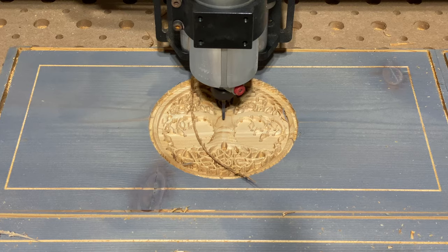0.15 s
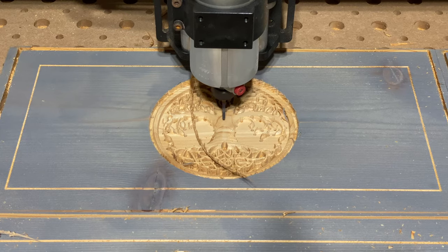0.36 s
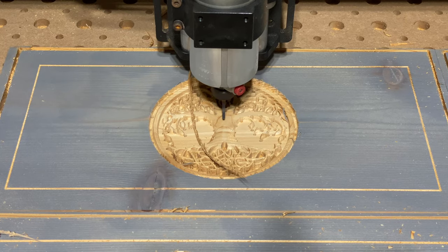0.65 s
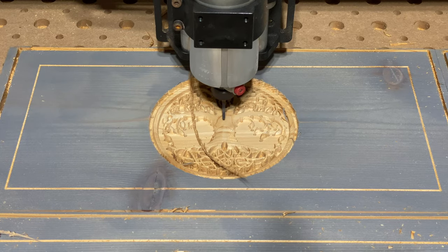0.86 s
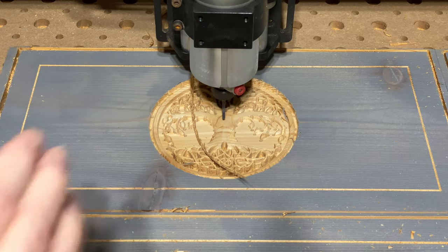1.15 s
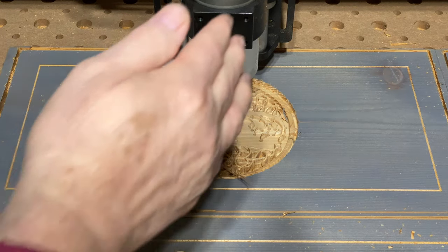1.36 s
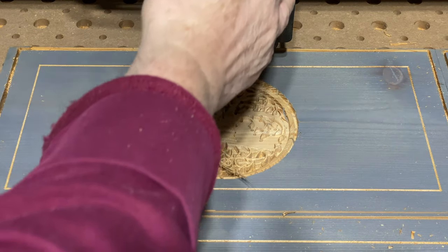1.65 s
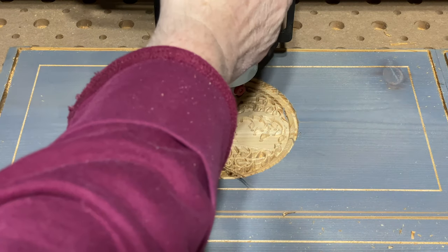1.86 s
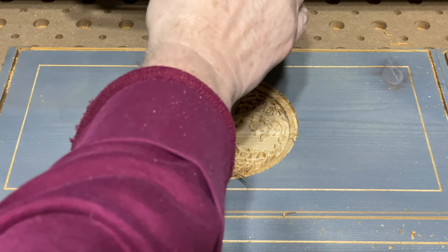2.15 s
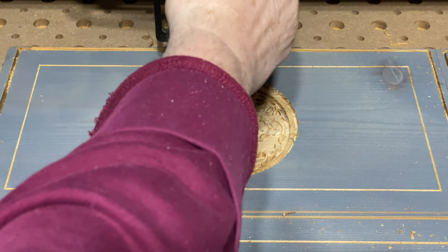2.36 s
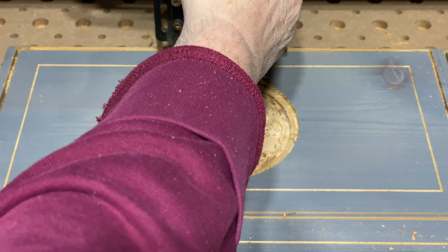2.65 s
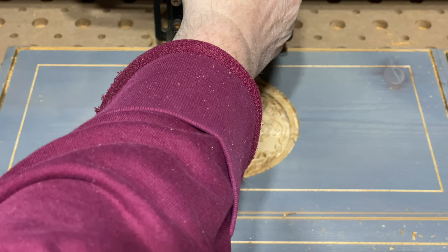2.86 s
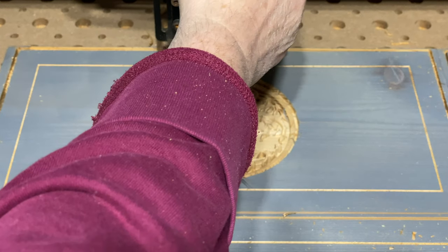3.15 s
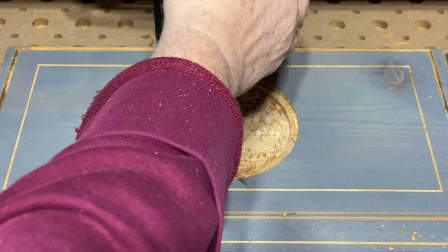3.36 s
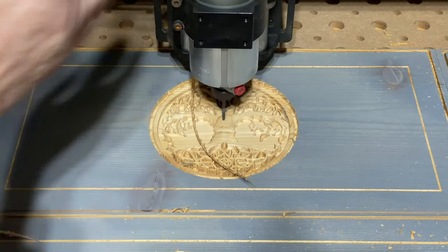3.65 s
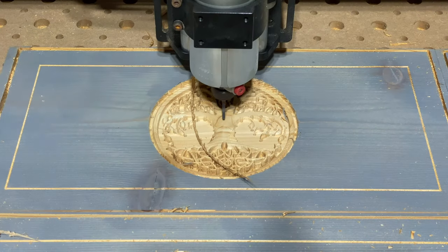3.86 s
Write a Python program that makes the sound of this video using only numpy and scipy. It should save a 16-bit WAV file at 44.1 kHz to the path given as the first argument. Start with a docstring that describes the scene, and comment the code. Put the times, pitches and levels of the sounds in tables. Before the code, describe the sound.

A router spindle whines steadily close by, then is switched off and coasts down in pitch.

```python
"""A router spindle runs close by in a small workshop: the uneven weight of its rotor hums,
the shaft adds harmonics, the bearings whine, and brushes and cooling air make filtered noise.
The whole sound swells up early on. An arm reaches over, shading the treble, and switches it off;
the rotor coasts down, its hum flaring as it passes the resonances of the frame, and brief whines
fall in pitch. Steady coloured noise makes the workshop background."""
import sys
import numpy as np
from scipy import signal
from scipy.fft import rfft, irfft, next_fast_len
from scipy.io import wavfile
from scipy.ndimage import map_coordinates

SR = 44100
rng = np.random.default_rng(int(sys.argv[2]) if len(sys.argv) > 2 else 0)


def wav_out(sig):
    """Save sig, one row per channel (or a flat mono array), as 16-bit PCM at SR to the path in sys.argv[1]."""
    wavfile.write(sys.argv[1], SR, np.round(np.clip(np.atleast_2d(sig).T, -1, 1) * 32767).astype(np.int16))


N = 176400
TIME_S = np.arange(N) / SR

RUN_HZ = 280.3  # shaft turns per second while powered
# Tone colour that the housing gives to air and rasp.
# Each row: frequency in Hz, relative level in dB per Hz.
HOUSING_COLOUR = [(30, -75), (100, -59), (170, -32), (260, -12), (385, -8.5), (680, -9.5), (790, -5),
                  (910, 3.5), (1050, -2), (1250, -2.5), (1420, -5.5), (2000, -7.5), (2450, -11), (2850, -5),
                  (3350, -5.5), (3600, -13), (7000, -16), (7550, -12), (8400, -17), (9400, -22),
                  (10600, -19), (11700, -24), (15700, -35)]


def undb(db):
    """Turn decibels into a gain."""
    return 10 ** (np.asarray(db) / 20)


def unit(x):
    """Scale to an rms (average strength) of 1."""
    return x / np.sqrt(np.mean(x ** 2))


def curve(rows):
    """Read a table of (seconds, value) at every sample."""
    return np.interp(TIME_S, *np.array(rows).T)


def by_hz(rows, hz):
    """Read a table of (Hz, value) along a logarithmic frequency axis."""
    table_hz, values = np.array(rows).T
    return np.interp(np.log(np.maximum(hz, 1)), np.log(table_hz), values)


def shape(x, response):
    """Filter by a function of frequency; extra length keeps the end off the start."""
    size = next_fast_len(N + SR // 10)
    hz = np.arange(size // 2 + 1) * SR / size
    return irfft(rfft(x, size) * response(hz), size)[..., :N]


def tint(x, rows):
    """Filter by a table of (Hz, dB)."""
    return shape(x, lambda hz: undb(by_hz(rows, hz)))


def wander(rate):
    """Join random points, `rate` of them a second, by straight lines."""
    return np.interp(TIME_S * rate, np.arange(512), rng.standard_normal(512))


def rotor():
    """The shaft holds its speed, then an exponential decay eases in at the switch."""
    switch_s, ease_s, slowing_per_s = 3.24, .03, .85
    slow_wobble, quick_wobble = .0005, .001  # fractions of the speed
    since_switch = (TIME_S - switch_s) / ease_s
    slowing = slowing_per_s * ease_s * np.logaddexp(0, since_switch)
    hz = RUN_HZ * np.exp(-slowing)
    halvings = slowing / np.log(2)  # how many times the speed has halved
    wobble = 1 + slow_wobble * wander(10) + quick_wobble * wander(90)
    turns = np.cumsum(hz * wobble) / SR
    coasting = 1 / (1 + np.exp(-since_switch))  # 0 powered, 1 coasting
    return hz, halvings, turns, coasting


def unbalance_hum(hz, turns):
    """Uneven weight shakes the frame once a turn, strongest at its resonances."""
    # Each row: shaft speed in Hz, hum level in dB.
    resonances = [(148, -76), (157, -62), (163, -70), (169, -54.5), (172, -60), (180, -54), (184, -69),
                  (200, -60), (205, -61), (210, -46), (215, -66), (223, -52), (231, -40), (234, -40),
                  (238.5, -31.3), (244.5, -34.5), (248, -39.5), (253, -57), (256, -48), (261, -54),
                  (269, -44), (276, -38.5), (281, -37.8)]
    level_db = by_hz(resonances, hz) + .5 * wander(9.74)
    return np.sqrt(2) * undb(level_db) * np.sin(2 * np.pi * turns)


def whine(turns, halvings, coasting):
    """Shaft and bearing tones follow the turns; their flutter deepens while they sweep down."""
    # Shaft harmonics with levels of their own, strong or weak.
    # Each row: multiple of the shaft rate, level in dB while powered.
    own_level_rows = [(2, -60.5), (11, -54.5), (12, -54.5), (16, -66), (17, -62), (18, -62), (19, -63),
                      (23, -62), (24, -63), (27, -69), (28, -79), (29, -73), (31, -53), (32, -60),
                      (37, -70), (39, -68), (40, -77), (43, -67), (47, -66), (54, -80)]
    # Bearing tones. Each row: multiple of the ball-pass rate, dB while running, dB while coasting.
    ball_rows = [(1, -48, -59), (2, -58, -66), (3, -54, -66), (4, -56, -64), (5, -59.5, -67), (6, -74, -76),
                 (7, -76, -74)]
    ball_pass = 4.104  # balls passing per turn
    other_db, coast_db = -71, -71.5  # other harmonics while powered; every harmonic while coasting
    shaft_fall_db, balls_fall_db = -15, -17  # change per halving of speed
    flutter_db, sweep_flare_db = 2, 3.5  # flutter while running, extra flutter while coasting

    def line(multiple, db):
        """One sine tone with its own flutter and starting phase."""
        db = db + (flutter_db + sweep_flare_db * coasting) * wander(34)
        phase = multiple * turns + rng.random()
        return np.sqrt(2) * undb(db.astype(np.float32)) * np.sin(2 * np.pi * phase)

    own_level = {int(round(k)): db for k, db in own_level_rows}
    out = 0
    for k in range(2, 57):
        db = own_level.get(k, other_db) * (1 - coasting) + coast_db * coasting
        out = out + line(k, db + shaft_fall_db * halvings)
    for k, run_db, slow_db in ball_rows:
        db = run_db + (slow_db - run_db) * coasting
        out = out + line(round(k) * ball_pass, db + balls_fall_db * halvings)
    return out


def rasp(turns, halvings):
    """Brushes and bearings make narrow noisy peaks that slide down with the speed."""
    peakiness_db, peak_spacing_hz = 10, 45
    brush_db, fall_db = -39, -23  # level, and change per halving of speed
    peaks = rng.uniform(-0.82, 1, size=1024)

    def peaky(hz):
        return undb(peakiness_db * np.interp(hz / peak_spacing_hz, np.arange(len(peaks)), peaks))

    track = shape(rng.standard_normal(N), peaky)
    # read the noise at the pace of the shaft, so that its pitch falls too
    played = map_coordinates(track, [turns / RUN_HZ * SR], order=3, mode="wrap")
    return unit(tint(played, HOUSING_COLOUR)) * undb(brush_db + fall_db * halvings)


def wide_noise(spectrum):
    """Coloured noise, partly different on the left and right."""
    # Strength of the differing part. Each row: frequency in Hz, level in dB.
    unrelated = [(40, -1), (250, -10), (550, -5), (1000, -12), (2000, -18), (3000, -12), (5500, -25),
                 (9000, -9)]
    mid, side = (unit(tint(rng.standard_normal(N), spectrum)) for _ in range(2))
    return mid + tint(side, unrelated) * np.array([[1], [-1]])


def air(turns, halvings):
    """Cooling air rushes, chopped once a turn, and dies as the fan slows."""
    rush_db, fall_db = -40.5, -25  # level, and change per halving of speed
    chop = 1 + .13 * np.sin(2 * np.pi * turns)
    return wide_noise(HOUSING_COLOUR) * chop * undb(rush_db + fall_db * halvings)


def power_cut():
    """Gain for air and rasp: part of the rushing is lost soon after the power is off."""
    cut_db, cut_s, fade_s = -5, 3.38, .047
    unpowered = 1 / (1 + np.exp((cut_s - TIME_S) / fade_s))
    return undb(cut_db * unpowered)


def workshop():
    """The background is steady coloured noise."""
    # Each row: frequency in Hz, relative level in dB per Hz.
    colour = [(30, -35), (200, 6.5), (400, -5), (650, -11), (930, 11), (1500, -12), (2500, -8), (3300, -2),
              (3800, -7), (6500, -16), (7600, -1), (9000, -5), (10800, -7), (13000, -17), (15700, -5)]
    return undb(-57) * wide_noise(colour)


def arm_shade(spindle):
    """The treble is dull at first, then brighter, and later shaded by the arm."""
    # Each row: time in seconds, gain of the treble in dB.
    treble_gain = [(.6, 5), (1, 9.5), (1.3, 9), (1.8, 7.5), (2.3, 8.5), (2.8, 4), (3.15, -3.5), (3.35, -6),
                   (3.6, 1)]
    high_pass = signal.butter(2, 8940, "high", fs=SR, output="sos")
    treble = signal.sosfiltfilt(high_pass, spindle)
    return spindle + treble * (undb(curve(treble_gain)) - 1)


def swells(turns):
    """Falling whines, part tone and part narrow noise, swell as they sweep through resonances."""
    # Each row: time of the peak in seconds, multiple of the shaft rate,
    # length in seconds between the points 3 dB below the peak, level in dB, noise width in Hz.
    rows = [(3.27, 53.8, .09, -58, 350), (3.277, 4.1, 0.014, -40, 11), (3.282, 18, 0.078, -51, 22),
            (3.323, 29.6, 0.068, -49, 230), (3.345, 41.9, 0.066, -51.5, 120), (3.373, 11.2, 0.026, -58, 90),
            (3.412, 21, 0.031, -52, 98), (3.435, 24, 0.053, -60, 30), (3.45, 16.4, 0.12, -59, 80),
            (3.464, 8.1, 0.14, -57, 140), (3.455, 4.1, 0.095, -42, 21), (3.48, 4.7, 0.039, -48.5, 130),
            (3.254, 24, 0.063, -59, 37), (3.577, 24.2, 0.043, -66, 33), (3.65, 26.3, 0.055, -60, 97),
            (3.67, 55, 0.057, -61, 160), (3.688, 12.4, 0.042, -56, 20), (3.683, 16.9, 0.04, -52.5, 130),
            (3.75, 4.14, .11, -59.5, 35), (3.804, 8.25, .16, -61.5, 51), (3.835, 12.35, 0.048, -64.5, 45)]
    clean_hz = 44.5  # narrower swells are mostly tone, wider ones mostly noise
    out = 0
    for at, multiple, length, db, width in rows:
        low_pass = signal.butter(3, width, fs=SR, output="sos")
        blur = signal.sosfilt(low_pass, rng.standard_normal((2, N)))
        a, b = unit(blur) * width / clean_hz
        angle = 2 * np.pi * multiple * turns
        tone = unit((1 + a) * np.sin(angle) + b * np.cos(angle))
        bell = .5 ** (2 * ((TIME_S - at) / length) ** 2)
        out = out + undb(db) * bell * tone
    return out


def scene():
    """Every spindle layer follows the rotor; the workshop noise stays steady."""
    hz, halvings, turns, coasting = rotor()
    tones = unbalance_hum(hz, turns) + whine(turns, halvings, coasting)
    rushing = (rasp(turns, halvings) + air(turns, halvings)) * power_cut()
    background = workshop()
    spindle = arm_shade(tones + rushing)
    return spindle + swells(turns) + background


def record(dry):
    """The level swells up; left and right differ in phase and level; the top is cut."""
    # Overall level. Each row: time in seconds, gain in dB.
    level = [(0, -18.5), (.65, -19), (.72, -15), (.82, -7.5), (.93, -2.6), (1.04, -1), (1.5, -1.28),
             (3.1, -1.7)]
    # Lead of the left over the right. Each row: frequency in Hz, phase in radians.
    left_phase = [(280, .25), (550, .9), (900, .65), (2000, .05), (3000, .65), (5000, .05), (7800, .1),
                  (8300, 1.35), (8700, 2.), (9500, 1.55), (10300, .5), (11600, 0), (12500, -2.5),
                  (13400, -3.1), (15600, -6.)]
    # Lead of the left over the right. Each row: frequency in Hz, level in dB.
    left_level = [(100, -1), (245, 2), (280, 5.2), (400, 1.7), (1000, 1), (2000, 0)]
    lead = np.array([[1], [-1]]) / 2  # half to each side, in opposite directions

    def two_sides(hz):
        return undb(lead * by_hz(left_level, hz)) * np.exp(1j * lead * by_hz(left_phase, hz))

    stereo = shape(dry * undb(curve(level)), two_sides)
    top_cut = signal.ellip(10, .2, 80, 15800, fs=SR, output="sos")  # steep low-pass at 15800 Hz
    return signal.sosfilt(top_cut, stereo)


dry = scene()
out = record(dry)
wav_out(out)
```